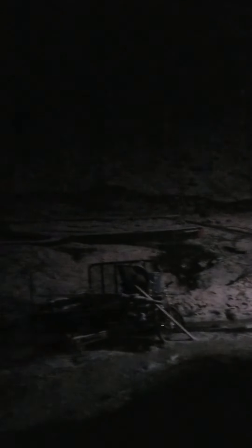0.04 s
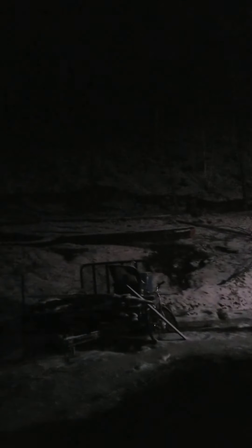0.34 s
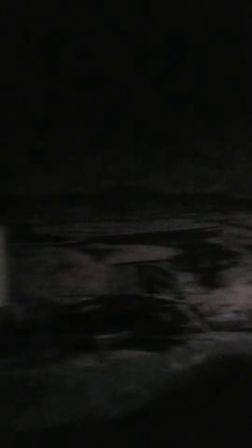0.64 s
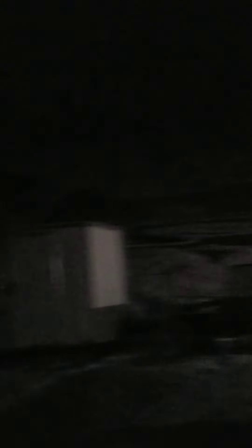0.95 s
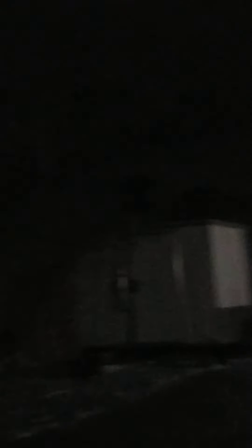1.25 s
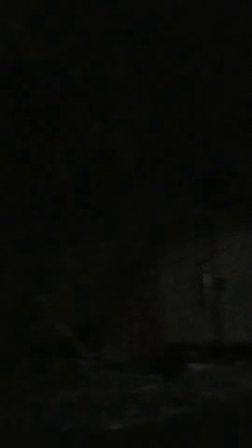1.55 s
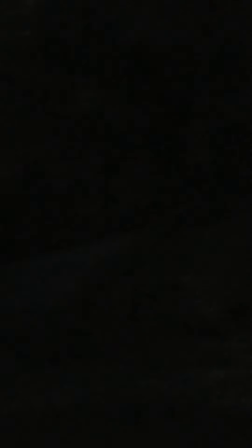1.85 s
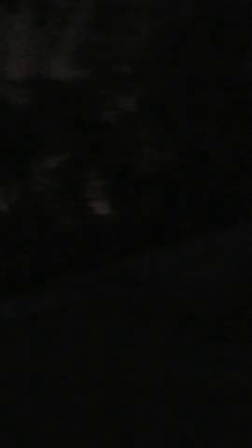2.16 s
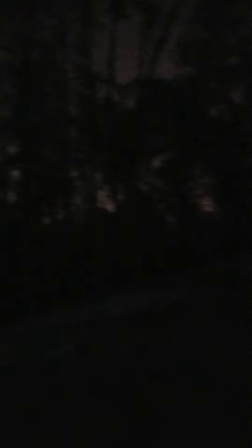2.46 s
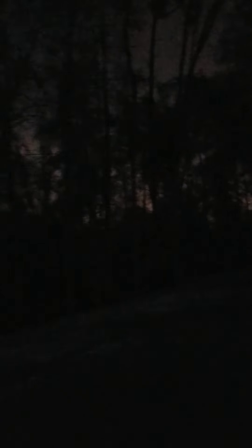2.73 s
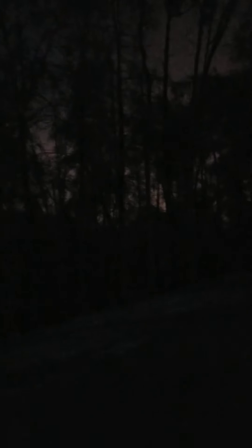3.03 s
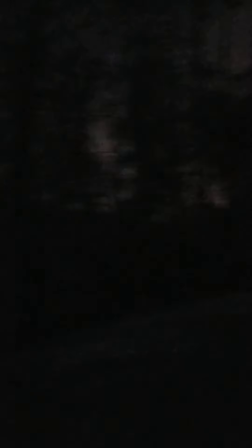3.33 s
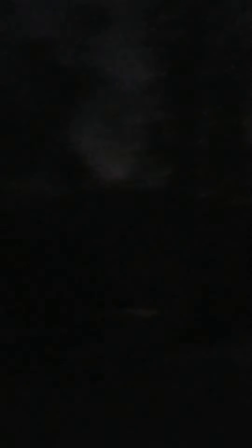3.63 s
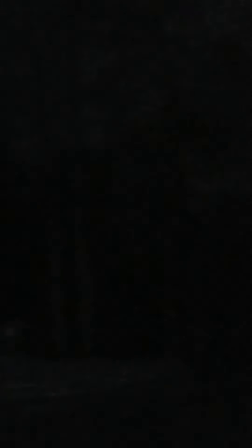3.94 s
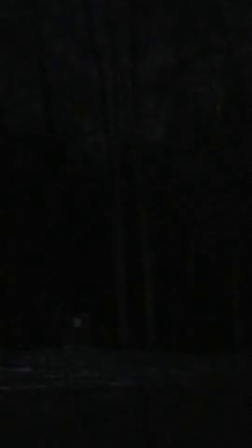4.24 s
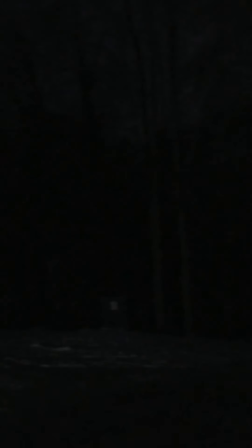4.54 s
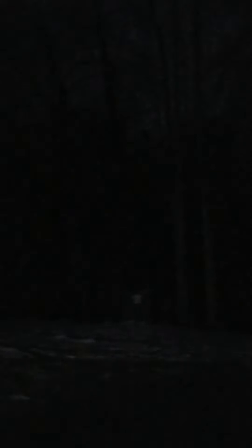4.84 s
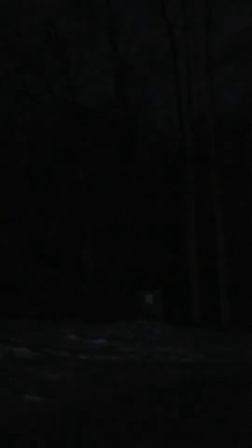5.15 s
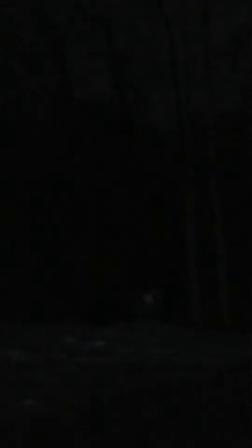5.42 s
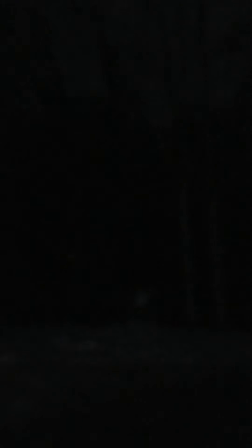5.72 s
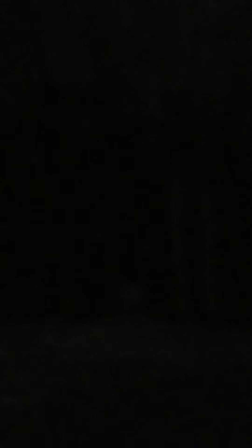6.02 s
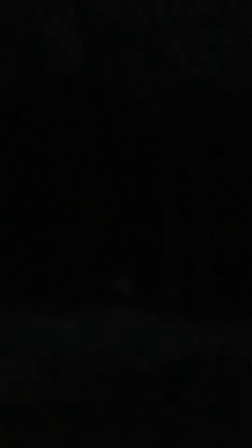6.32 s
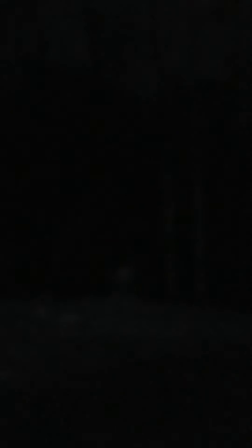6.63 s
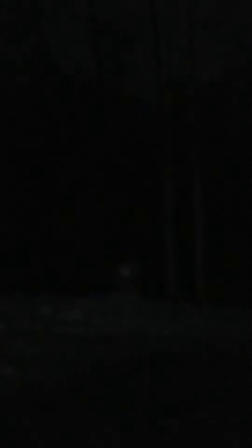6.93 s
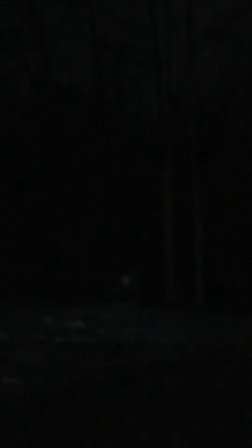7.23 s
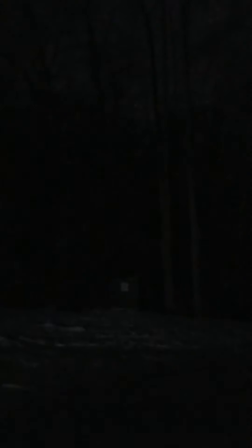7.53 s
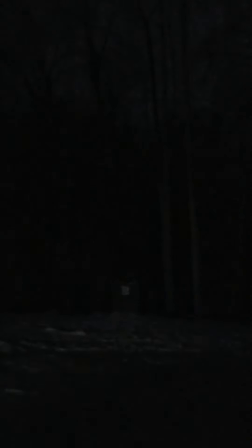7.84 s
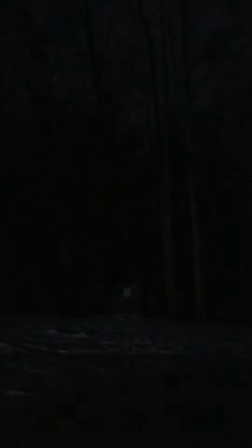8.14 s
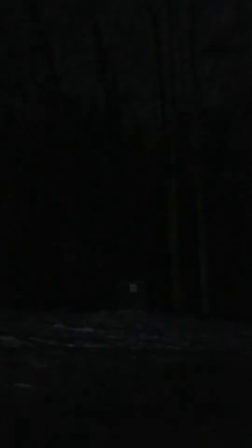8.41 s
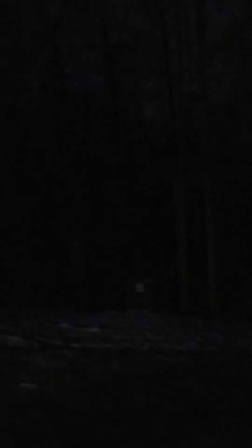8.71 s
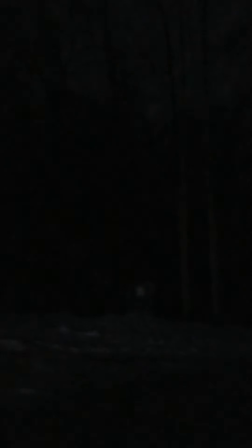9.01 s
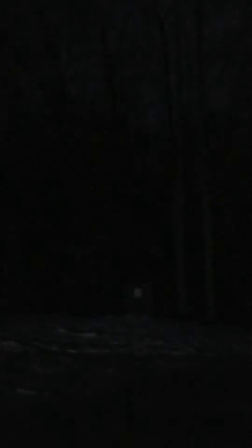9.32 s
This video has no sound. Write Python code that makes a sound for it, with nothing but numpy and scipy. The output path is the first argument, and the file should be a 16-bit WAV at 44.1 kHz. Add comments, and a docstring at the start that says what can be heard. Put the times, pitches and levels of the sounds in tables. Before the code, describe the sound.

Freezing rain hisses in night woods as a tree breaks with sharp cracks, falling ice, crackling twigs and low thuds.

```python
"""Freezing rain hisses in a wood at night, with a light wind and a few ice pellets ticking close by.
Some way off an ice-laden tree starts to give: sparse snaps, each a hollow knock and a splintering tear
that scatter among the trunks. From about 3 s the limbs break harder and shed ice showers down.
Around 6-8 s the crown crashes through the twigs and thuds on the ground, then the debris settles."""
import sys
import numpy as np
from scipy import signal
from scipy.fft import rfft, irfft, next_fast_len
from scipy.io import wavfile

SR = 44100
rng = np.random.default_rng(int(sys.argv[2]) if len(sys.argv) > 2 else 0)


def to_wav(sig):
    """Store sig (one row per channel, or 1-D mono) as 16-bit WAV at the path in sys.argv[1].

    Samples outside -1..1 are clipped; the rate is SR.
    """
    pcm = np.clip(np.atleast_2d(sig), -1, 1) * 32767
    pcm = np.round(pcm).astype(np.int16)
    wavfile.write(sys.argv[1], SR, pcm.T)  # frames by channels


N = 422037

# bright tinkle of falling ice: freq_hz, level_db
ICE_SPECTRUM = [(400, -39), (1200, -3), (3000, -1), (5000, 0), (6000, -3), (8000, -2), (9300, -9.5),
                (11000, -9.5), (12700, -8), (16000, -10)]
# midrange crackle of twigs: freq_hz, level_db
TWIG_SPECTRUM = [(80, -26), (300, -7), (550, 0), (1300, 1), (2200, -2.5), (4000, -2), (8000, -28.5),
                 (16000, -27)]
# ring of snapping wood: pitch_ratio, level_db
WOOD_MODES = [(.55, -19.5), (1, -0.5), (1.42, -17), (1.8, -15), (2.3, -16), (3.1, -18.5)]


def undb(db):
    """Decibels to gain."""
    return 10 ** (np.asarray(db) / 20)


def gain_at(hz, points):
    """Gain of a (freq_hz, level_db) curve, joined on a log-frequency axis."""
    f, db = np.transpose(points)
    return undb(np.interp(np.log(hz + 1), np.log(f), db))


def colour(x, points, size=4096):
    """Minimum-phase EQ with the given spectrum; white noise keeps its power."""
    gain = gain_at(np.fft.rfftfreq(size, 1 / SR), points)
    cepstrum = irfft(np.log(gain / np.sqrt(np.mean(gain ** 2))))
    cepstrum[1:size // 2] *= 2
    cepstrum[size // 2 + 1:] = 0
    impulse = irfft(np.exp(rfft(cepstrum)))
    return signal.oaconvolve(x, impulse[None], axes=1)[:, :x.shape[1]]


def diffuse(x, alike_hz=950):
    """Sound from all around: long waves reach both microphone ports alike, short ones unrelated."""
    size = next_fast_len(x.shape[1], True)
    alike = .99 * np.exp(-np.log(2) * (np.fft.rfftfreq(size, 1 / SR) / alike_hz) ** 2)
    mid, side = rfft(x, size)
    mid, side = mid * np.sqrt((1 + alike) / 2), side * np.sqrt((1 - alike) / 2)
    return irfft([mid + side, mid - side], size)[:, :x.shape[1]]


def grains(length, rate_hz, spread_db):
    """Two channels of tiny impacts of uneven size, rms 1."""
    sizes = undb(spread_db * np.minimum(rng.exponential(size=(2, length)), 5))
    x = (rng.random((2, length)) < rate_hz / SR) * sizes * rng.standard_normal((2, length))
    return x / np.sqrt(np.mean(x ** 2) + 1e-12)


def burst(t, rise_s, decay_s, rate_hz=14000):
    """A run of clicks that swells and dies; rms about 1 at its height."""
    shape = (1 - np.exp(-t / rise_s)) ** 2 * np.exp(-t / decay_s)
    clicks = grains(len(t), rate_hz, spread_db=2.5) * shape
    return clicks * np.sqrt(np.sum(shape ** 2) / np.sum(clicks ** 2, axis=1, keepdims=True)) / shape.max()


def drift(rate_hz):
    """Smooth random modulation with a spread near 1."""
    steps = rng.standard_normal(2048)
    return np.interp(np.arange(N) / SR * rate_hz, np.arange(len(steps)), steps)


def add(out, start_s, x):
    """Mix a sound in at its start time."""
    i = max(int(start_s * SR), 0)
    out[:, i:i + x.shape[-1]] += x[..., :N - i]


def knock(t, hz, cycles, modes=((1, 0),)):
    """Heavily damped wood that peaks after the given cycles and dies quickly."""
    u = t * hz / cycles
    ring = sum(undb(db) * np.sin(2 * np.pi * hz * ratio * t) for ratio, db in modes)
    return u ** 2 * np.exp(2 * (1 - u)) * ring


def trunk_echo(t, near_s=0.035, far_t60_s=1.0, far_db=-13, build_s=0.0098):
    """Impulse response of the wood: separate returns from near trunks, then a smooth far tail."""
    near = grains(len(t), rate_hz=2300, spread_db=3.5) * np.exp(-t / near_s)
    far = rng.standard_normal((2, len(t))) * undb(far_db) * np.exp(-np.log(1000) * t / far_t60_s)
    echo = (near + far) * (1 - np.exp(-t / build_s))
    return echo / np.sqrt(np.sum(echo ** 2) / 2)


def breeze(gust_db=4.5, pan_db=-4):
    """A light wind buffets each microphone port on its own."""
    # rise and fall of the wind: time_s, level_db
    envelope = [(0, -61), (0.5, -50.5), (1.3, -61), (1.9, -54.5), (2.6, -62), (4, -74), (6.3, -91),
                (9.5, -68)]
    # low flutter of air on a port: freq_hz, level_db
    buffet_spectrum = [(20, -26), (40, 2), (75, 11), (115, -5), (200, -20), (600, -44)]
    level_db = np.interp(np.arange(N) / SR, *np.transpose(envelope))
    port_db = np.array([level_db + side * pan_db / 2 + gust_db * drift(7.1) for side in (1, -1)])
    return colour(rng.standard_normal((2, N)) * undb(port_db), buffet_spectrum)


def freezing_rain(patter_db=-48.5, pellet_db=-68):
    """Countless frozen drops patter on glazed branches; a few nearer ones prickle singly."""
    # hiss of the rain bed: freq_hz, level_db
    rain_spectrum = [(40, 0.5), (200, -19), (400, 0), (700, 1), (1500, 1), (4500, -5.5), (6000, -29),
                     (8000, -21), (9500, -11), (13000, -5), (16000, -5)]
    patter = grains(N, rate_hz=20000, spread_db=2.3) * undb(patter_db + 0.77 * drift(8.3))
    pellets = grains(N, rate_hz=14, spread_db=2) * undb(pellet_db)
    return colour(patter, rain_spectrum) + colour(pellets, ICE_SPECTRUM)


def ice_ticks(detune=0.056):
    """Bits of ice strike close by: dry, very short, and higher for smaller bits."""
    # close hits: start_s, level_db, left_minus_right_db, pitch_ratio
    hits = [(0.0257, -22, 27.5, 1), (0.3625, -41, 0, 1), (0.8625, -30, 3, 4.4), (1.545, -34, 0, 4.8),
            (2.5659, -21.5, 28, 1), (3.9953, -20.5, 24, 1), (5.2353, -18.5, -9, 1), (5.2385, -17, 1, 1),
            (6.0133, -15, -2, 4.8), (6.186, -27, 0, 4.8), (6.872, -19, 0, 1.5)]
    # ring of one tick: freq_hz, level_db, t60_s
    modes = [(754, -12, 0.0067), (1410, -12, 0.0036), (2650, -6, 0.0044), (3380, -4, 0.0021),
             (7300, -23, 0.0037), (13000, -31, .0015)]
    t, out = np.arange(SR // 20) / SR, np.zeros((2, N))
    for start_s, level_db, pan_db, pitch_ratio in hits:
        ratios = pitch_ratio * (1 + detune * rng.standard_normal(len(modes)))
        ring = sum(undb(db) * np.exp(-np.log(1000) * t / t60_s) * np.cos(2 * np.pi * hz * ratio * t)
                   for (hz, db, t60_s), ratio in zip(modes, ratios) if hz * ratio < SR / 2)
        add(out, start_s, undb(level_db + np.array([[pan_db], [-pan_db]]) / 2) * ring)
    return out


def falling_loads():
    """Envelopes for ice, fine splinters, twigs and ground: loads swell and fade over a steady trickle."""
    # loads coming down: start_s, swell_s, base_fade_db_per_s, ice_db, fine_db, twig_db, ground_db
    loads = [(0.55, 0.035, 63, -48, -62, -48, -55), (0.83, .06, 63, -50, -52, -45.5, -54),
             (1.12, 0.077, 40, -52, -64, -43.5, -53), (1.89, .07, 20, -38.5, -44, -52, -50),
             (2.0, .1, 27, -42.5, -62, -47.5, -68), (2.39, 0.051, 3.5, -41, -55, -67, -56),
             (2.76, 0.15, 31, -37, -58, -40, -76), (3.33, .07, 9, -38, -40, -32.5, -60),
             (3.48, .42, 2.5, -32.5, -43, -50, -53.5), (4.3, 0.74, 4, -32.5, -39, -36, -72),
             (5.87, 0.088, 47, -41, -50, -33, -52), (5.9, 0.46, 5.5, -41.5, -38.5, -55, -52.5),
             (6.43, 0.38, 5.4, -31, -37, -37, -41), (7.13, 0.24, 22.5, -30.5, -48, -35, -61),
             (9.44, 0.052, 20, -46, -47, -52, -51)]
    # constant trickle all over the wood: ice_db, fine_db, twig_db, ground_db
    trickle_db = (-49.5, -60, -48.5, -58.5)
    # settling speed, times the base fade: ice_ratio, fine_ratio, twig_ratio, ground_ratio
    settling = (1.12, 1.66, 0.87, 1)
    t = np.arange(N) / SR
    control_t = t[::64]
    power = undb(trickle_db)[:, None] ** 2
    for start_s, swell_s, base_fade_db_per_s, *levels_db in loads:
        swell = np.clip((control_t - start_s) / swell_s, 0, 1)
        fade_db = np.outer(settling, base_fade_db_per_s * np.maximum(control_t - start_s - swell_s, 0))
        power = power + (swell * undb(np.array(levels_db)[:, None] - fade_db)) ** 2
    return [np.interp(t, control_t, np.sqrt(p)) for p in power]


def debris(ice, fine, twig, ground):
    """Shed ice tinkles, its splinters sparkle, swept twigs crackle and the mass rumbles on the ground."""
    # sheen of the finest ice splinters: freq_hz, level_db
    sparkle_spectrum = [(3000, -35), (7000, -12), (9500, -7.5), (12700, -0.5), (16000, -1)]
    # low end of debris landing: freq_hz, level_db
    rumble_spectrum = [(20, -29), (45, -4.5), (80, -1), (125, 1.5), (190, 0.5), (280, -6), (500, -10),
                       (2000, -60)]
    shower = grains(N, rate_hz=38000, spread_db=1.3) * ice * undb(0.74 * drift(40))
    sparkle = grains(N, rate_hz=9000, spread_db=2.0) * fine * undb(1.2 * drift(25))
    crackle = grains(N, rate_hz=10000, spread_db=1.5) * twig * undb(0.3 * drift(35))
    rumble = grains(N, rate_hz=1500, spread_db=1.9) * ground * undb(1.5 * drift(16))
    return (colour(shower, ICE_SPECTRUM) + colour(sparkle, sparkle_spectrum)
            + colour(crackle, TWIG_SPECTRUM) + colour(rumble, rumble_spectrum))


def twig_snaps(twig, count=70, above_db=1, spread_db=2.5, centre_hz=1700, spread_octaves=.6, pan_db=3):
    """Here and there a single twig snaps clear of the crackle, louder while more is falling."""
    t, out = np.arange(SR // 20) / SR, np.zeros((2, N))
    onsets = rng.integers(0, N, count)
    variations = np.clip(rng.standard_normal((count, 3)), -2, 2)
    for i, (size, pitch, side) in zip(onsets, variations):
        snap = knock(t, centre_hz * 2 ** (spread_octaves * pitch), cycles=2.6, modes=WOOD_MODES)
        port_db = above_db + spread_db * size + pan_db * side * np.array([[1], [-1]])
        add(out, i / SR, twig[i] * undb(port_db) * snap)
    return out


def wood_thuds(echo_db=-5):
    """Heavy wood booms as a big limb snaps or a limb lands, and the trunks echo it."""
    # low thuds of heavy wood: start_s, pitch_hz, level_db
    thuds = [(3.675, 154, -30.5), (4.59, 166, -28), (4.600, 76, -31), (5.880, 132, -27.5),
             (6.900, 104, -36), (6.950, 85, -35), (7.553, 149, -30.5), (7.557, 374, -32),
             (7.948, 325, -30.5), (8.011, 130, -26)]
    t, out = np.arange(SR // 2) / SR, np.zeros((2, N))
    for start_s, pitch_hz, level_db in thuds:
        boom = undb(level_db) * knock(t, pitch_hz, cycles=0.84)
        add(out, start_s, boom)
        add(out, start_s, undb(echo_db) * signal.fftconvolve(boom, trunk_echo(t)[0]))
    return out


def breaking_limbs(mode_scatter=0.064, tear_delay_s=0.00119, crunch_db=-13, strain_db=-11,
                   glaze_db=-21, glaze_delay_s=0.0074, echo_db=-2.0, knock_send_db=-7.0):
    """Fibres give, the limb knocks and tears, its glaze shatters, and the trunks throw the snap back."""
    # limbs snapping: start_s, pitch_hz, knock_db, overtone_db, splinter_db, splinter_decay_s
    cracks = [(0.189, 840, -37.5, 0, -55, .002), (0.573, 533, -46, 0, -39.5, .011),
              (0.599, 1050, -33, 2, -42, .004), (0.863, 417, -46, 0, -38.5, 0.01),
              (1.0993, 262, -26.5, 1, -28, 0.0061), (1.1109, 3520, -17.5, 1, -33, .002),
              (2.043, 3300, -27.5, 0, -49, .003), (2.094, 2330, -32, 0, -42, 0.0032),
              (2.494, 680, -37, -5, -52, 0.0035), (2.7851, 644, -16.5, 1, -25, 0.0097),
              (2.831, 810, -23.5, 4, -28.5, 0.0046), (3.197, 1310, -32, 11, -48, 0.0018),
              (3.3314, 615, -10, -1, -19, 0.015), (3.383, 1390, -19, -2, -23.5, 0.0054),
              (3.464, 630, -27, 0, -26, 0.0062), (3.5758, 514, -21, 4, -21, 0.0035),
              (3.608, 520, -38, 12, -26, .0044), (3.624, 557, -36, 8, -25, 0.005),
              (3.649, 2390, -18.5, -5, -34, .003), (3.773, 577, -29, 0, -29, .0031),
              (3.900, 524, -30, -3, -38, .0067), (4.113, 528, -25.5, -5, -25.5, .0047),
              (4.528, 594, -27.5, 9, -35, .0026), (4.5836, 594, -2, 5.5, -19.5, .009),
              (4.613, 706, -19, -2, -23.5, .006), (4.633, 860, -17, 0, -25, 0.0044),
              (4.8431, 548, -12, 0, -25, 0.0052), (4.9938, 556, -7.5, 12.5, -14.5, 0.0048),
              (5.043, 1250, -14, 2, -26, .0032), (5.143, 580, -27, -2, -26.5, 0.0082),
              (5.548, 1240, -23, 0, -37, .0032), (5.8770, 489, -8, 9, -13, 0.0033),
              (5.905, 611, -25, 6, -18.5, 0.0014), (5.9242, 560, -31, -1, -19, 0.0029),
              (5.992, 533, -35, 0, -20, .0022), (6.022, 474, -37, -2, -24, .0036),
              (6.198, 600, -42, 0, -32, .0036), (7.001, 1510, -16, -4, -33, .003),
              (7.375, 1120, -21, 5.5, -31, 0.0024), (7.450, 880, -25, 0, -36, .0044)]
    # rip of wood fibres: freq_hz, level_db
    splinter_spectrum = [(35, -30), (80, -7.5), (180, -11), (300, -2), (500, 2), (900, -2), (1500, 0.5),
                         (2400, -2.5), (3400, -4), (4800, -13), (8000, -16), (10000, -22.5), (16000, -18)]
    # tone of the echo among the trunks: freq_hz, level_db
    echo_spectrum = [(50, 9.5), (170, 5), (320, -8.5), (600, -2), (1200, -1.5), (2500, 4), (5000, 2.5),
                     (9000, 4.5), (16000, 0)]
    # the knocks shift sideways as the microphone swings round: time_s, left_lag_s
    bearing = [(1.1, .0002), (2.8, -.00014), (3.6, -.00008), (4.5, .0003), (5.9, .00027)]
    t = np.arange(SR // 2) / SR
    short_t, medium_t = t[:len(t) // 8], t[:len(t) // 2]
    knocks, fibres, strain, glaze, echoes = np.zeros((5, 2, N))
    for start_s, pitch_hz, knock_db, overtone_db, splinter_db, decay_s in cracks:
        # every limb has its own overtones around the knock pitch
        modes = [(ratio ** (1 + mode_scatter * rng.standard_normal()), db + overtone_db * (k > 1))
                 for k, (ratio, db) in enumerate(WOOD_MODES)]
        wood = undb(knock_db) * knock(short_t, pitch_hz, cycles=1.77, modes=modes)
        lag_s = np.interp(start_s, *np.transpose(bearing))
        add(knocks[:1], start_s + lag_s / 2, wood)
        add(knocks[1:], start_s - lag_s / 2, wood)
        tear = undb(splinter_db) * colour(burst(short_t, 0.35 * decay_s, decay_s), splinter_spectrum)
        add(fibres, start_s + tear_delay_s, tear)
        # the last fibres let go one by one
        crunch = burst(medium_t, rise_s=0.0058, decay_s=.026, rate_hz=900)
        add(fibres, start_s, undb(splinter_db + crunch_db) * colour(crunch, splinter_spectrum))
        # a reversed burst: small failures build up to the snap
        build_up = burst(short_t, rise_s=1 / SR, decay_s=0.0057)[:, ::-1]
        add(strain, start_s - short_t[-1], undb(splinter_db + strain_db) * build_up)
        shatter = burst(medium_t, rise_s=0.0023, decay_s=0.051)
        add(glaze, start_s + glaze_delay_s, undb(splinter_db + glaze_db) * shatter)
        send = tear + undb(knock_send_db) * wood
        add(echoes, start_s, undb(echo_db) * signal.fftconvolve(send, trunk_echo(t), axes=1))
    direct = fibres + colour(strain, TWIG_SPECTRUM) + colour(glaze, ICE_SPECTRUM)
    return knocks + diffuse(direct, alike_hz=1150) + diffuse(colour(echoes, echo_spectrum), alike_hz=800)


def scene():
    """The breaking tree inside the hiss of the wood; showers and rain come from all around."""
    ice, fine, twig, ground = falling_loads()
    impacts = breaking_limbs() + wood_thuds() + ice_ticks() + twig_snaps(twig)
    surround = diffuse(debris(ice, fine, twig, ground) + freezing_rain())
    return impacts + surround + breeze()


def record(dry):
    """Each microphone port adds its own colour; the loudest peaks are rounded, the top cut steeply."""
    # tonal tilt between the two ports: freq_hz, left_minus_right_db
    port_balance = [(600, 0), (1300, -1.5), (2000, 1), (2700, 5), (3700, 1.5), (5200, -6.5), (8000, -5),
                    (10800, -0.5), (12700, -3), (15500, 3)]
    ceiling, top_hz = .95, 15900
    size = next_fast_len(N + SR // 10, True)
    tilt = np.sqrt(gain_at(np.fft.rfftfreq(size, 1 / SR), port_balance))
    heard = irfft(rfft(dry, size) * np.array([tilt, 1 / tilt]), size)[:, :N]
    rounded = heard / (1 + (heard / ceiling) ** 6) ** (1 / 6)
    return signal.sosfilt(signal.ellip(12, .2, 80, top_hz, fs=SR, output="sos"), rounded)


dry = scene()
out = record(dry)
to_wav(out)
```